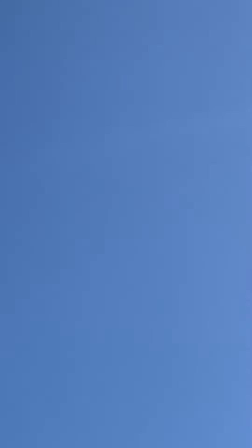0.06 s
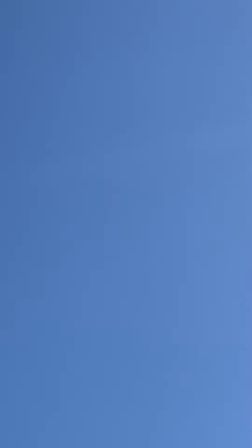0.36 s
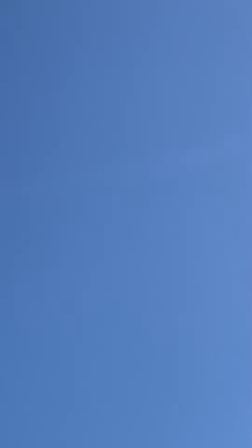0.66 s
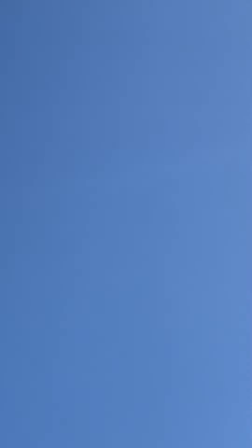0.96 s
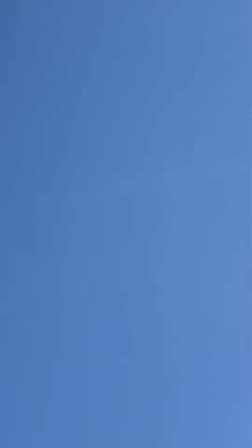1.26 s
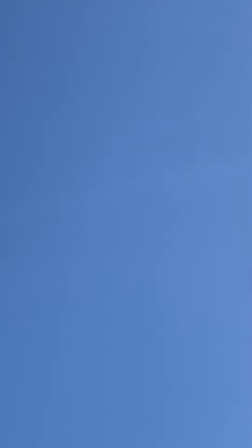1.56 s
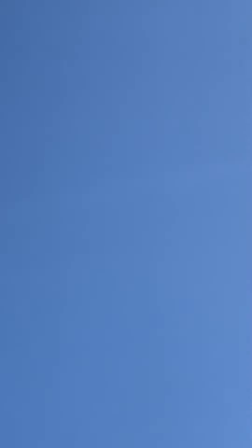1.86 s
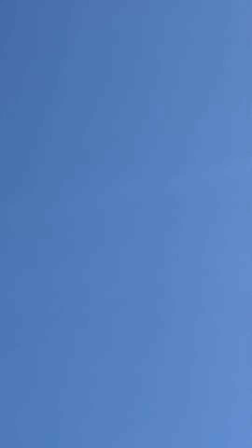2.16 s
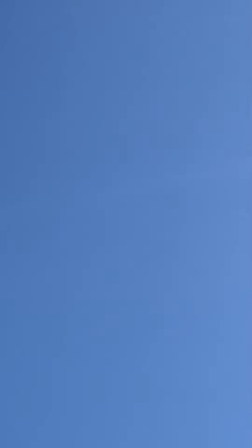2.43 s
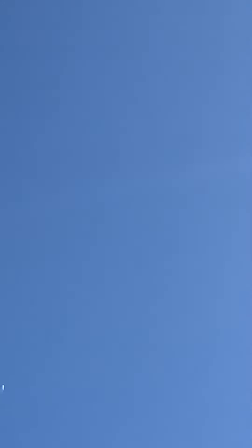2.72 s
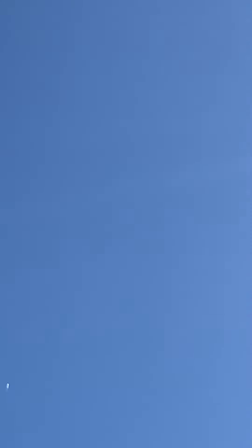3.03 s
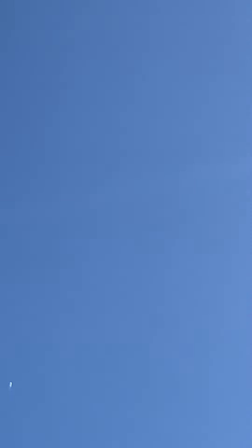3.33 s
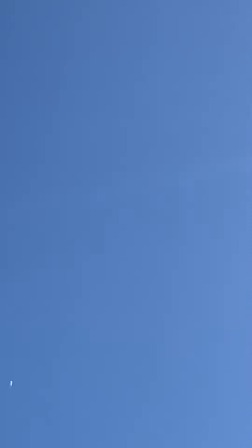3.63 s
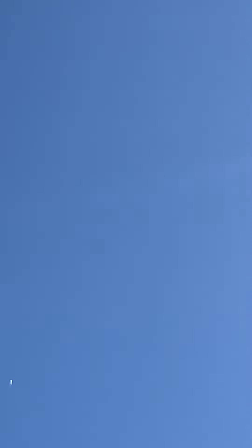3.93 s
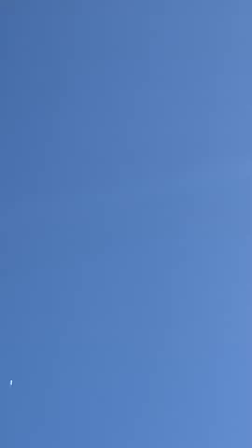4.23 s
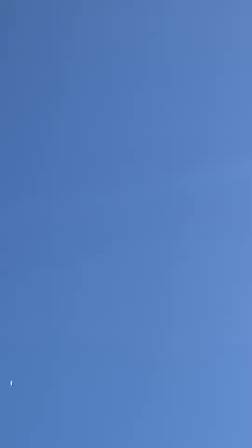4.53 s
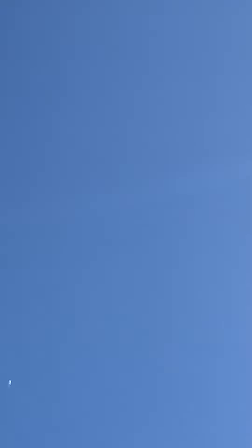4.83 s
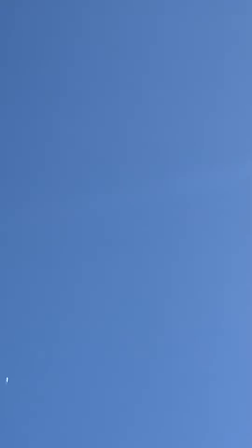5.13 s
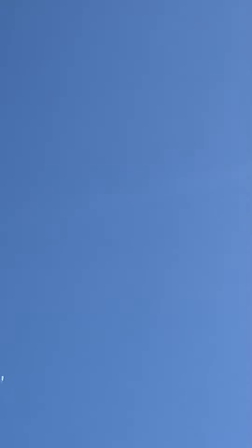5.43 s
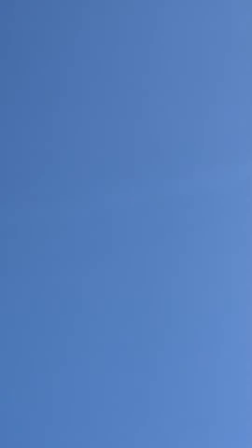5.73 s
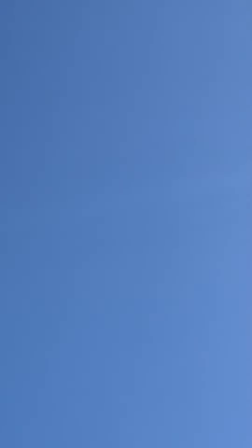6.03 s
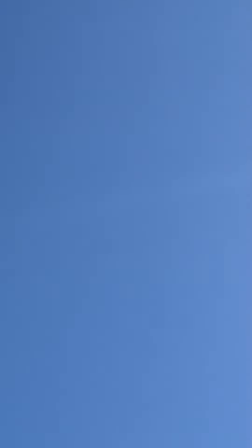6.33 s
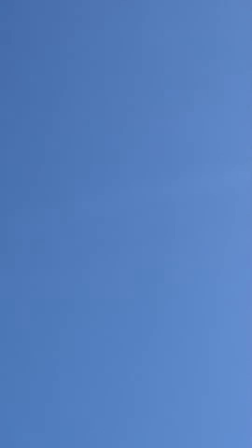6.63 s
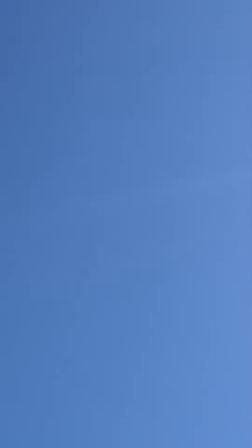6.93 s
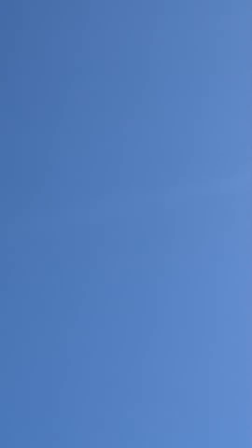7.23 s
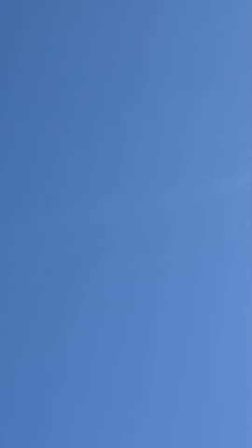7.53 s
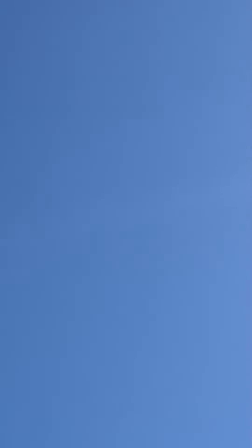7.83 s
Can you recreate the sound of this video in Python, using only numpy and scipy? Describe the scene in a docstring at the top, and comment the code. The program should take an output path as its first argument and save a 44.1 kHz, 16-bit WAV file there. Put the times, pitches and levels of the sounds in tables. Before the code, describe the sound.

Outdoors, a low, turbulent roar comes down from a rocket far overhead, packed with irregular thumps and dull crackling. The pounding keeps going throughout, heaviest shortly before the middle, and a brief flutter of hollow pops follows a little later. Faint swirls and airy swishes come and go, over a very soft electronic hiss from the microphone.

```python
"""Under open sky: a deep, buffeting roar, most likely a rocket climbing far overhead.
The turbulent exhaust rumbles and sheds shock fronts that arrive as thuds and crackle, each with its
ground echo. Brief swirls, faint swishes and wisps come and go; one run of hollow pops flaps past.
The microphone smears the bass, a limiter holds the peaks, faint hiss lies underneath."""
import sys
import numpy as np
from scipy import signal
from scipy.fft import rfft, irfft, next_fast_len
from scipy.io import wavfile
from scipy.ndimage import uniform_filter1d, minimum_filter1d

SR = 44100
rng = np.random.default_rng(int(sys.argv[2]) if len(sys.argv) > 2 else 0)


def file_out(sig):
    """Save sig as 16-bit WAV at sys.argv[1]."""
    # one column per channel
    cols = np.atleast_2d(sig).T
    # limit, then scale
    lim = np.clip(cols, -1, 1)
    pcm = np.round(lim * 32767).astype(np.int16)
    wavfile.write(sys.argv[1], SR, pcm)


N = 347067
TIME = np.arange(N) / SR

# Table levels are relative.
# slow exhaust surges: t/s, body level/dB, roar level/dB
EXHAUST_SURGES = [(0.0, -32, -34), (0.11, -33, -39), (0.24, -26.5, -38), (0.5, -24, -38.5),
                  (0.68, -24.5, -43.5), (0.8, -31, -50), (0.87, -29, -41.5), (1.03, -25, -34),
                  (1.51, -26.5, -40), (1.8, -25, -36), (2.05, -24, -39), (2.13, -25, -46.5),
                  (2.3, -22, -43), (2.69, -23, -38.5), (2.9, -23, -40), (3.03, -25.5, -53),
                  (3.11, -20, -42.5), (3.4, -23.5, -39.5), (3.92, -24.5, -45.5), (4.15, -24, -44),
                  (4.32, -24.5, -37), (4.56, -25, -45), (4.69, -27.5, -41), (4.84, -23.5, -36.5),
                  (5.3, -26, -35), (5.6, -25.5, -39), (5.73, -30, -43), (5.9, -25.5, -41),
                  (6.09, -24.5, -39), (6.42, -23, -43), (6.58, -23.5, -38), (6.75, -24.5, -38),
                  (6.86, -27, -45), (6.96, -22, -39), (7.28, -26, -38), (7.58, -28, -38), (7.87, -25, -29)]
# mid turbulence: f/Hz, density/dB
ROAR_SPECTRUM = [(120, -20), (250, 6), (400, -2.5), (650, -5.5), (1000, -17.5), (1500, -29.5), (2200, -50),
                 (4000, -76)]
# deep turbulence: f/Hz, density/dB
RUMBLE_SPECTRUM = [(18, 6), (30, 12), (42, 19), (60, 19), (78, 18), (98, -4), (130, -3), (170, -7),
                   (260, -13), (400, -35), (800, -81.5)]
# prominent shock fronts: t/s, pressure jump/dB, rise/ms
STRONG_FRONTS = [(0.0972, 3.5, 0.34), (0.1751, 2.5, 0.25), (0.208, 1.5, 0.29), (0.3059, 2, 0.35),
                 (0.36, -3, 0.31), (0.534, 2, 0.3), (0.613, 0, 0.5), (0.8489, 4, 0.43), (0.8675, 3.5, 0.39),
                 (0.952, 3, 0.47), (1.0, 0, 0.47), (1.043, 4.5, 0.35), (1.068, -3, 0.37),
                 (1.0781, 0.5, 0.36), (1.1314, 3.5, 0.32), (1.158, -13.5, 0.28), (1.1806, 1, 0.34),
                 (1.2491, 4, 0.4), (1.3599, 5.5, 0.72), (1.4483, 5.5, 0.33), (1.4729, -4.5, 0.25),
                 (1.5062, -1, 0.34), (1.6199, 2.0, 0.45), (1.673, 3.5, 0.41), (1.712, 2.5, 0.46),
                 (1.7956, 3.5, 0.5), (1.82, -10.5, 0.32), (1.8344, 3, 0.67), (1.879, 0.5, 0.41),
                 (1.9447, 2.5, 0.47), (1.9796, 5.5, 0.57), (2.0281, 3, 0.32), (2.069, -7.5, 0.28),
                 (2.169, -2, 0.46), (2.221, -2, 0.46), (2.259, -2, 0.46), (2.297, 0, 0.53),
                 (2.316, -4, 0.46), (2.396, 2, 0.42), (2.432, -3.5, 0.51), (2.46, -3.5, 0.57),
                 (2.5042, 2.8, 0.41), (2.5379, 5, 0.36), (2.5607, 1.5, 0.39), (2.579, -8, 0.36),
                 (2.6, -1.5, 0.36), (2.618, -1, 0.48), (2.642, -1.5, 0.54), (2.6808, 6.5, 0.59),
                 (2.7302, 7.5, 0.49), (2.7973, 8, 0.36), (2.839, -3, 0.31), (2.89, 6.5, 0.46),
                 (2.929, 1, 0.56), (2.9632, 5.5, 0.69), (3.0213, 4, 0.85), (3.0675, 6.5, 0.3),
                 (3.1084, -8, 0.24), (3.133, 3, 0.45), (3.1899, 5.5, 0.65), (3.2421, 3.5, 0.39),
                 (3.2698, 1.5, 0.41), (3.302, 2.5, 0.52), (3.338, 4.5, 0.87), (3.3667, 6, 0.59),
                 (3.377, -3, 0.4), (3.3965, 1, 0.5), (3.4269, 3.5, 0.42), (3.4712, 6, 0.33),
                 (3.51, -8, 0.25), (3.5482, 8, 0.49), (3.599, 6, 0.53), (3.6652, 2.5, 0.62),
                 (3.7045, 4, 0.71), (3.7788, 7, 0.34), (3.819, -12.5, 0.23), (3.864, 0.5, 0.6),
                 (3.9076, 4.5, 0.65), (4.021, 5.5, 0.35), (4.307, 1.5, 0.44), (4.3675, 3, 0.34),
                 (4.4025, 3.5, 0.56), (4.4629, 3.5, 0.34), (4.528, -8.5, 0.37), (4.6305, 6.5, 0.38),
                 (4.688, 3.5, 0.28), (4.7082, -0.5, 0.42), (4.8329, 2, 0.36), (4.9262, 1, 0.45),
                 (4.975, -6.5, 0.28), (5.091, 1.5, 0.38), (5.18, 4, 0.23), (5.262, -6.5, 0.26),
                 (5.297, -4.5, 0.3), (5.316, -4.5, 0.29), (5.352, 3, 0.32), (5.391, -5, 0.27),
                 (5.4277, 3.5, 0.32), (5.4668, 4.5, 0.31), (5.511, 5, 0.3), (5.5558, -2, 0.35),
                 (5.5953, 3.5, 0.45), (5.6459, 3.5, 0.43), (5.678, 1.5, 0.45), (5.768, 3.5, 0.26),
                 (5.7942, 0, 0.53), (5.8305, 2.5, 0.34), (5.8932, 2, 0.47), (5.9249, 3.5, 0.315),
                 (5.9762, 5, 0.36), (6.048, 1.5, 0.47), (6.1044, 0.5, 0.47), (6.1313, 3.5, 0.29),
                 (6.1718, 0.5, 0.66), (6.2305, 2, 0.48), (6.255, -5, 0.43), (6.282, 2, 0.35),
                 (6.322, 1, 0.56), (6.44, -0.5, 0.47), (6.5, -3, 0.4), (6.538, -1.5, 0.41),
                 (6.582, -5, 0.4), (6.596, -2, 0.45), (6.615, -9, 0.45), (6.655, -5, 0.38),
                 (6.6734, 0, 0.38), (6.701, -3, 0.4), (6.724, -3.5, 0.4), (6.744, -3, 0.37),
                 (6.7977, 0, 0.38), (6.8886, 2.5, 0.26), (6.913, -12.5, 0.33), (6.93, 0, 0.3),
                 (6.971, -4.5, 0.34), (7.001, 0, 0.39), (7.076, 2.5, 0.36), (7.114, 4.5, 0.44),
                 (7.1875, 3, 0.45), (7.249, -0.5, 0.44), (7.282, -1.5, 0.44), (7.31, -4, 0.34),
                 (7.359, -1, 0.36), (7.4226, 2.5, 0.37), (7.449, -7.5, 0.38), (7.464, -8, 0.29),
                 (7.644, 6, 0.51), (7.683, -2, 0.41), (7.7, -16, 0.41), (7.72, 1.5, 0.5),
                 (7.7901, 5.5, 0.49), (7.8195, -1.5, 0.46), (7.829, -4.5, 0.33), (7.841, 2, 0.35)]
# hollow pops, falling in pitch: t/s, f/Hz, level/dB
POP_RUN = [(5.0215, 880, -13.5), (5.040, 580, -8.5), (5.061, 620, -20), (5.078, 650, -13),
           (5.098, 570, -12.5), (5.122, 375, -12)]
# rising swirls: t/s, half length/s, f/Hz, level/dB
SWIRL_EVENTS = [(2.566, 0.056, 525.5, -27.5), (2.765, 0.016, 660, -32.5), (3.589, 0.029, 640, -28),
                (3.617, 0.014, 665, -25.5), (6.189, 0.025, 540, -22.5), (6.323, 0.0086, 890, -32.5),
                (6.585, 0.03, 557, -33), (7.019, 0.034, 601, -35), (7.255, 0.012, 753, -23.5),
                (7.325, 0.045, 660, -34.5)]
# airy swishes: t/s, half length/s, level/dB
SWISH_EVENTS = [(1.504, 0.048, -60), (1.976, .13, -69.5), (2.078, 0.025, -61), (3.425, .07, -64.5),
                (5.247, 0.08, -63), (4.002, 0.036, -69.5), (6.93, 0.045, -60.5), (7.449, 0.05, -64)]
# swish colour: f/Hz, density/dB
SWISH_SPECTRUM = [(900, -27.5), (1700, 6), (2400, -2), (3000, -18.5), (4300, -17.5), (6000, -43)]
# thin high rustles: t/s, half length/s, f/Hz, level/dB
WISP_EVENTS = [(0.718, 0.02, 2350, -68), (0.81, 0.04, 2500, -72), (2.113, 0.018, 2790, -72),
               (3.39, 0.053, 2520, -71), (4.0, 0.05, 2420, -70.5), (7.1, 0.15, 2395, -71.5),
               (7.42, 0.08, 2420, -72)]
# close reflection, shifting as the microphone moves: t/s, delay/ms, level/dB
NEAR_REFLECTION = [(0, 1.5, -7.5), (1.2, 1.44, -8), (2.0, 1.04, -14.5), (3.0, 0.88, -12), (4.5, 0.94, -9.5),
                   (5.1, 0.92, -15), (5.4, 0.87, -8.5), (5.8, 0.89, -3.5), (6.5, 0.82, -9),
                   (7.2, 0.69, -16), (7.87, 0.97, -16)]
# ground echo, later as the source climbs: t/s, delay/ms
GROUND_DELAY = [(0, 7.37), (3, 7.76), (5, 7.77), (6, 7.99), (7.87, 8.02)]
# two farther surfaces: delay/s, level/dB, cutoff/Hz
FAR_ECHOES = [(0.0261, -23.5, 2993), (0.041, -15.5, 2990)]
# scatter from the surroundings: f/Hz, level/dB
SCATTER_SPECTRUM = [(60, -16), (150, -7.5), (300, -3.5), (600, 3), (900, 0), (1450, -4.5), (3000, -5.5)]
# microphone all-passes, bass lag: f/Hz, Q
MIC_ALLPASSES = [(50.4, .56), (97.4, .81), (296, .86)]
# microphone peaks and dips: f/Hz, Q, gain/dB
MIC_EQ = [(517, 2, -6), (715, 22, 2), (745, 3.2, -7), (970, 14, 2), (1095, 2.2, -3.5), (1820, 3.4, 1),
          (2220, 2, -5), (3220, 1.9, 6)]
# electronic hiss: f/Hz, density/dB
HISS_SPECTRUM = [(1000, 9), (2500, 10.5), (4000, 6.5), (5000, -0.5), (6500, 6), (11000, -17), (16000, -4)]


def exhaust_roar(body_db, roar_db, gain_db=-4.0, body_share=0.15,
                 flutter_db=3.5, flutter_hz=22.0, rasp_db=4.5, rasp_hz=142.0):
    """Mid turbulence: noise that surges, flutters and rasps."""
    surge_db = gain_db + roar_db + body_share * (body_db - body_db.mean())
    level_db = surge_db + flutter_db * wobble(flutter_hz) + rasp_db * wobble(rasp_hz)
    return from_db(level_db) * noise(ROAR_SPECTRUM)[0]


def exhaust_rumble(gain_db=-2.0, fade_in_s=0.02):
    """Deep turbulence: steady noise."""
    return from_db(gain_db) * noise(RUMBLE_SPECTRUM)[0] * np.tanh(TIME / fade_in_s) ** 2


def shock_train(fronts, relax_s=0.0044, wrinkle_db=-19.0, wrinkle_s=0.0024, wrinkles=4):
    """Pressure sags, jumps, relaxes at each front; turbulent air adds weaker copies around it."""
    reach = SR // 35
    out = np.zeros(N + 2 * reach)
    shares = np.r_[1, np.full(wrinkles, from_db(wrinkle_db))]
    for at_s, jump_db, rise_ms in fronts:
        offsets_s = np.r_[0, wrinkle_s * rng.standard_normal(wrinkles)]
        t = np.arange(-reach, reach) / SR - offsets_s[:, None]
        teeth = np.tanh(t * 1000 / rise_ms) * np.exp(-np.abs(t) / relax_s)
        start = int(np.clip(at_s * SR, 0, N))
        out[start:start + 2 * reach] += from_db(jump_db) * (shares @ teeth)
    return out[reach:reach + N]


def strong_shocks(gain_db=-4.5, cutoff_hz=2600):
    """Distinct fronts: a short rise cracks, a long one thuds. Air absorbs the top treble."""
    at_s, jump_db, rise_ms = np.transpose(STRONG_FRONTS)
    return lowpass(shock_train(zip(at_s, jump_db + gain_db, rise_ms)), cutoff_hz, order=3)


def thuds(body_db, roar_db, gap_s=0.033, gap_spread=0.26, gain_db=-4, spread_db=2.0, body_share=0.073,
          base_rise_ms=0.67, rise_spread=0.041, steepening_per_db=0.1342, cutoff_hz=1200, count=300):
    """Uneven train of blunt fronts, heavier and steeper as the exhaust surges."""
    gap_z, jump_z, rise_z = np.clip(rng.standard_normal((count, 3)), -2, 2).T
    at_s = np.cumsum(gap_s * np.exp(gap_spread * gap_z))
    body_swing_db = np.interp(at_s, TIME, body_db - body_db.mean())
    roar_swing_db = np.interp(at_s, TIME, roar_db - roar_db.mean())
    jump_db = gain_db + body_share * body_swing_db + spread_db * jump_z + lull_db(at_s)
    steepening = steepening_per_db * (body_swing_db + roar_swing_db) / 2
    rise_ms = base_rise_ms * np.exp(rise_spread * rise_z - steepening)
    fronts = np.c_[at_s, jump_db, rise_ms][at_s < N / SR]
    return lowpass(shock_train(fronts), cutoff_hz, order=4)


def crackle(roar_db, gain_db=18.0, spread_db=4.2, lull_share=0.47,
            base_rise_ms=0.38, rise_spread=0.044, cutoff_hz=1900, count=420):
    """Weak fronts at random times; their level tracks the roar."""
    at_s = rng.random(count) * N / SR
    jump_z, rise_z = np.clip(rng.standard_normal((count, 2)), -2, 2).T
    jump_db = np.interp(at_s, TIME, roar_db) + gain_db + spread_db * jump_z + lull_share * lull_db(at_s)
    rise_ms = base_rise_ms * np.exp(rise_spread * rise_z)
    return lowpass(shock_train(zip(at_s, jump_db, rise_ms)), cutoff_hz, order=4)


def lull_db(at_s, depth_db=-12, reach_s=0.022):
    """Level drop of weak fronts: a strong front swallows its neighbours."""
    strong_s, jump_db, _ = np.transpose(STRONG_FRONTS)
    nearness = np.exp(-((strong_s - at_s[:, None]) / reach_s) ** 4)
    strength = np.minimum(from_db(jump_db), 1)
    return depth_db * (strength * nearness).max(axis=1)


def snaps(hz=3120.0, half_s=0.00085, lag_s=0.00048, gain_db=-45.0, steep_ms=0.22, loss_db_per_ms=520):
    """Thin bright edge of the steepest fronts; blunter ones lose it."""
    out = np.zeros(N)
    reach = SR // 200
    for at_s, jump_db, rise_ms in STRONG_FRONTS:
        edge_db = jump_db + gain_db - loss_db_per_ms * max(rise_ms - steep_ms, 0)
        span = slice(int(at_s * SR) - reach, int(at_s * SR) + reach)
        t = TIME[span] - at_s - lag_s
        out[span] += swell(t, half_s, edge_db) * np.sin(2 * np.pi * hz * t)
    return out


def pops(peak_cycles=0.73, cutoff_hz=1880):
    """Dry, hollow tone bursts: peak within a cycle, gone in a few."""
    out = np.zeros(N)
    for at_s, hz, db in POP_RUN:
        cycles = np.clip(hz * (TIME - at_s), 0, 20)
        envelope = cycles / peak_cycles * np.exp(1 - cycles / peak_cycles)
        out += from_db(db) * envelope * np.sin(2 * np.pi * cycles)
    return lowpass(out, cutoff_hz, order=5)


def swirls(half_width_hz=64.0, octaves_per_s=6.7):
    """Hollow noise bands that swell, glide up and fade."""
    out = np.zeros(N)
    for at_s, half_s, hz, db in SWIRL_EVENTS:
        pitch_hz = hz * 2 ** np.clip(octaves_per_s * (TIME - at_s), -1, 1)
        phase = 2 * np.pi * np.cumsum(pitch_hz) / SR
        band = wobble(half_width_hz) * np.cos(phase) + wobble(half_width_hz) * np.sin(phase)
        out += swell(TIME - at_s, half_s, db) * band / np.sqrt(2)
    return out


def swishes():
    """Faint swells of airy stereo noise."""
    envelope = sum(swell(TIME - at_s, half_s, db) for at_s, half_s, db in SWISH_EVENTS)
    return envelope * noise(SWISH_SPECTRUM, channels=2)


def wisps(half_width_hz=84.0):
    """Faint swells of narrow, high noise at steady pitch."""
    baseband = (wobble(half_width_hz) + 1j * wobble(half_width_hz)) / np.sqrt(2)
    out = np.zeros(N)
    for at_s, half_s, hz, db in WISP_EVENTS:
        band = np.real(baseband * np.exp(2j * np.pi * hz * TIME))
        out += swell(TIME - at_s, half_s, db) * band
    return out


def reflections(x, ground_db=-4.0, ground_cutoff_hz=2800, wander_ms=0.11, wander_hz=6):
    """Add echoes in turn: a close surface that hollows the mids, the ground, two far surfaces."""
    near_ms, near_db = curves(NEAR_REFLECTION)
    x = x + from_db(near_db) * delay(x, near_ms / 1000)
    # sound leaves from all along the plume, so the ground path wanders
    ground_ms = curves(GROUND_DELAY)[0] + wander_ms * wobble(wander_hz)
    x = x + from_db(ground_db) * lowpass(delay(x, ground_ms / 1000), ground_cutoff_hz)
    return x + sum(from_db(db) * lowpass(delay(x, lag_s), hz) for lag_s, db, hz in FAR_ECHOES)


def scatter(x, decay_s=0.0055, linger_s=0.013, linger_db=-13, grain_db=4.5, grain_hz=273.0):
    """The surroundings return each band's energy as a short grainy wash, different at each port."""
    edges_hz = np.geomspace(45, 4000, 12)
    hz, db = np.transpose(SCATTER_SPECTRUM)
    grains = rng.standard_normal((2, 2, N)) * from_db(grain_db * wobble(grain_hz))
    out = 0
    for k, (low_hz, high_hz) in enumerate(zip(edges_hz, edges_hz[1:])):
        band = signal.butter(2, [low_hz, high_hz], "band", fs=SR, output="sos")
        power = signal.sosfilt(np.vstack([band, band]), x) ** 2   # two passes: steeper skirts
        power = tail(power, decay_s) + from_db(linger_db) ** 2 * tail(power, linger_s)
        carrier = unit_rms(signal.sosfilt(band, grains[k % 2]))   # adjacent bands uncorrelated
        gain = from_db(np.interp(np.log(low_hz * high_hz) / 2, np.log(hz), db))
        out = out + gain * signal.sosfilt(band, np.sqrt(power) * carrier)
    return out


def mic_ports(x, left_lag_s=0.00008):
    """Two ports: in phase in the bass, drifting apart in the treble."""
    return np.array([delay(x, left_lag_s), allpass(x, hz=2300, q=1.9)])


def mic_response(x, low_cut_hz=148.2):
    """Low cut, bass lag, peaks and dips."""
    x = signal.sosfilt(signal.butter(2, low_cut_hz, "high", fs=SR, output="sos"), x)
    for hz, q in MIC_ALLPASSES:
        x = allpass(x, hz, q)
    for hz, q, db in MIC_EQ:
        band = (x - allpass(x, hz, q)) / 2
        x = x + (from_db(db) - 1) * band
    return x


def limiter(x, ceiling_db=-0.7, release_db_per_s=261.5, ahead_samples=65):
    """Gain ducks just ahead of each peak and recovers fast."""
    peak_db = 20 * np.log10(np.abs(x).max(axis=0) + 1e-9)
    over_db = np.maximum(peak_db - ceiling_db, 0)
    ramp_db = release_db_per_s * TIME
    held_db = np.maximum.accumulate(over_db + ramp_db) - ramp_db
    gain_db = minimum_filter1d(-held_db, 2 * ahead_samples)
    for _ in range(2):
        gain_db = uniform_filter1d(gain_db, ahead_samples)
    return x * from_db(gain_db)


def whine(x, gain_db=-64.0, hz=SR / 4):
    """Faint carrier near 11 kHz, modulated by the signal."""
    return x * from_db(gain_db) * np.cos(2 * np.pi * hz * TIME)


def hiss(common_db=-69.5, separate_db=-79.0):
    """Electronic noise: one part shared, one per channel."""
    common = from_db(common_db) * noise(HISS_SPECTRUM)
    return common + from_db(separate_db) * noise(HISS_SPECTRUM, channels=2)


def from_db(db):
    """Decibels to gain."""
    return 10 ** (np.asarray(db) / 20)


def unit_rms(x):
    """Scale to rms 1."""
    return x / np.sqrt(np.mean(x ** 2) + 1e-20)


def curves(rows):
    """Interpolate each value column to every sample."""
    at_s, *columns = np.transpose(rows)
    return [np.interp(TIME, at_s, column) for column in columns]


def swell(t, half_s, peak_db):
    """Gaussian envelope around t = 0."""
    return from_db(peak_db) * np.exp(-(t / half_s) ** 2)


def noise(spectrum, channels=1):
    """Noise of the given spectrum, rms 1."""
    hz, db = np.transpose(spectrum)
    length = next_fast_len(N)
    bins_hz = np.maximum(np.fft.rfftfreq(length, 1 / SR), 1)
    gain = from_db(np.interp(np.log(bins_hz), np.log(hz), db))
    white = rng.standard_normal((channels, length))
    return unit_rms(irfft(rfft(white) * gain, length)[:, :N])


def wobble(hz):
    """Random drift below hz, rms 1."""
    return unit_rms(lowpass(rng.standard_normal(N + SR), hz, order=2)[SR:])


def lowpass(x, hz, order=1):
    """Butterworth low-pass."""
    return signal.sosfilt(signal.butter(order, hz, fs=SR, output="sos"), x)


def allpass(x, hz, q):
    """Lag around hz, flat magnitude."""
    w = 2 * np.pi * hz / SR
    alpha = np.sin(w) / (2 * q)
    a = [1 + alpha, -2 * np.cos(w), 1 - alpha]
    return signal.lfilter(a[::-1], a, x)


def delay(x, lag_s):
    """Fractional delay, constant or varying."""
    return np.interp(TIME - lag_s, TIME, x, left=0)


def tail(power, decay_s):
    """Spread energy over an exponential decay."""
    pole = np.exp(-1 / (decay_s * SR))
    return signal.lfilter([1 - pole], [1, -pole], power)


def scene(left_tilt_db=0.55):
    """Exhaust, shocks and swirls with echoes and scatter; the rest direct only. Left slightly louder."""
    body_db, roar_db = curves(EXHAUST_SURGES)
    turbulence = exhaust_rumble() + exhaust_roar(body_db, roar_db)
    shocks = thuds(body_db, roar_db) + crackle(roar_db) + strong_shocks()
    arriving = reflections(turbulence + shocks + swirls())
    stereo = mic_ports(arriving) + scatter(arriving)
    direct = snaps() + pops() + swishes() + wisps()
    return (stereo + direct) * from_db([[left_tilt_db], [-left_tilt_db]])


def record(dry, drive_db=3.0, cutoff_hz=15700):
    """Microphone, limiter, whine and hiss, steep top cut."""
    x = limiter(from_db(drive_db) * mic_response(dry))
    top_cut = signal.ellip(10, 0.1, 80, cutoff_hz, fs=SR, output="sos")
    return signal.sosfilt(top_cut, x + whine(x) + hiss())


dry = scene()
out = record(dry)
file_out(out)
```